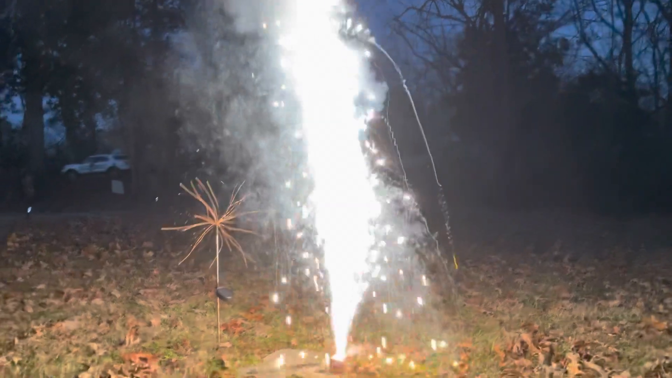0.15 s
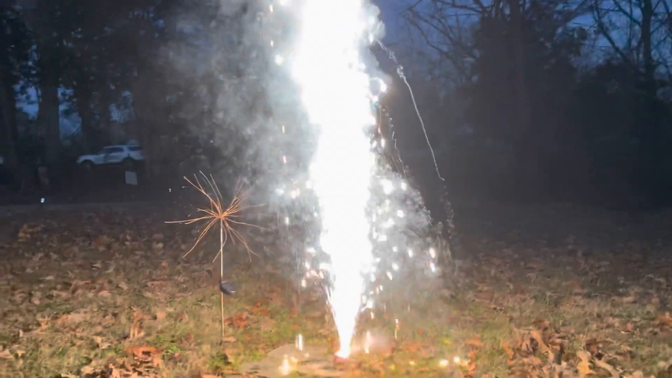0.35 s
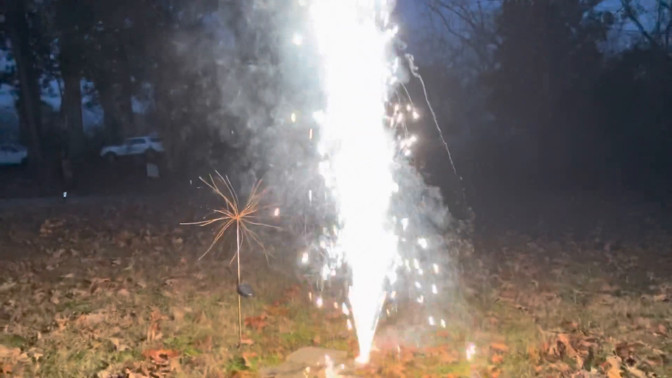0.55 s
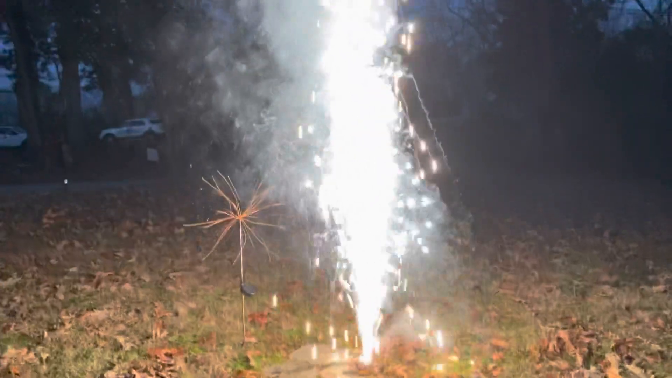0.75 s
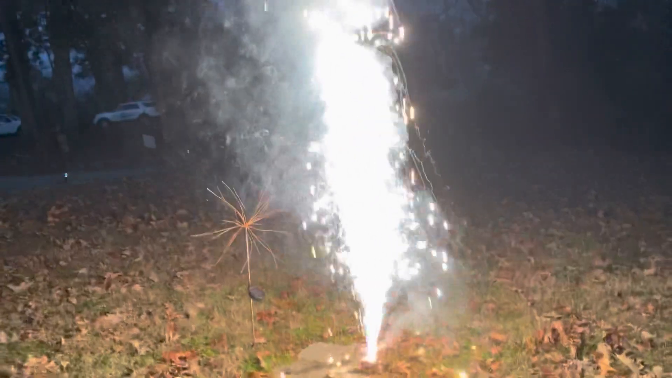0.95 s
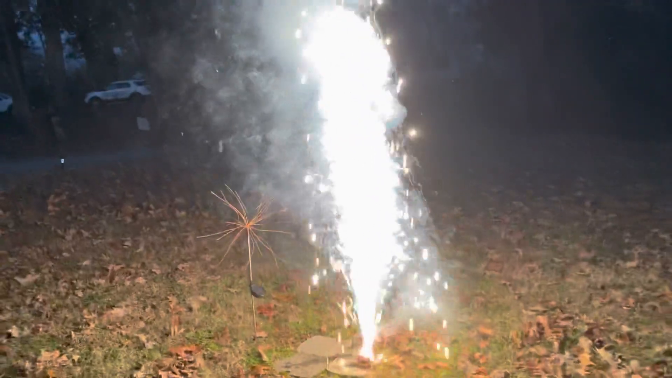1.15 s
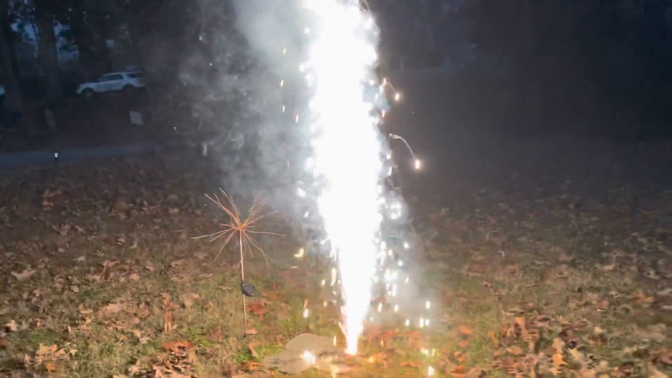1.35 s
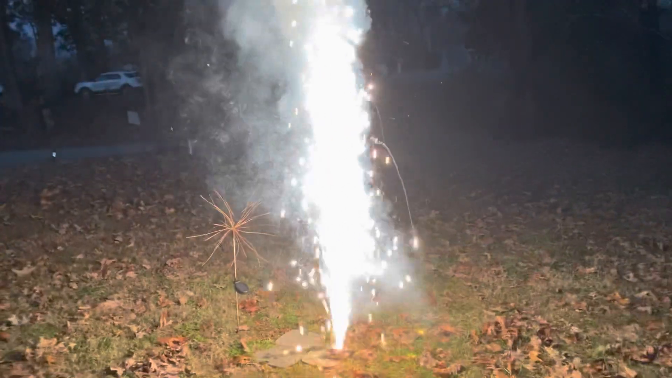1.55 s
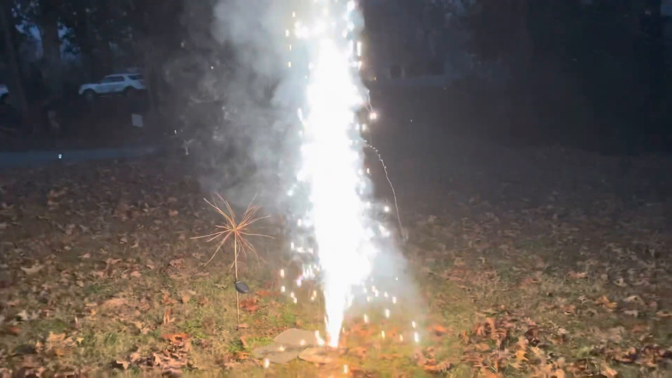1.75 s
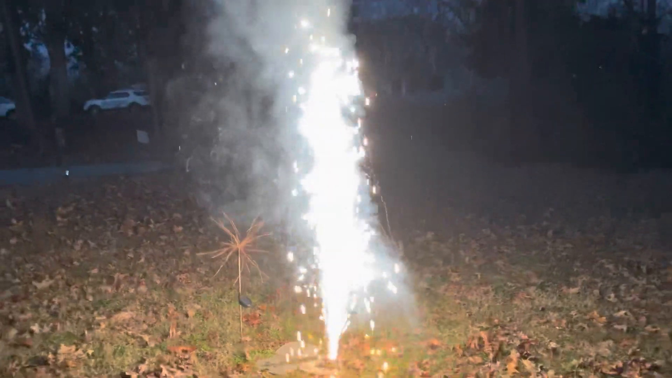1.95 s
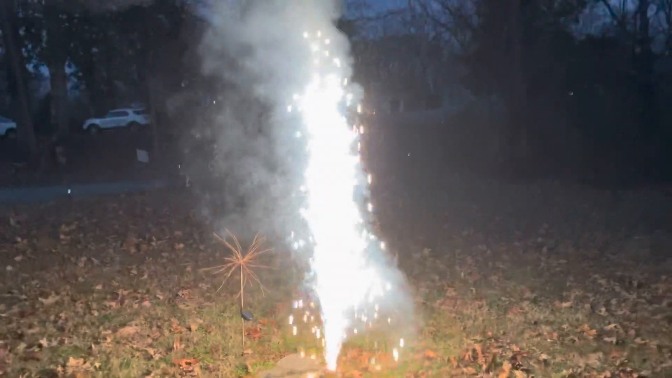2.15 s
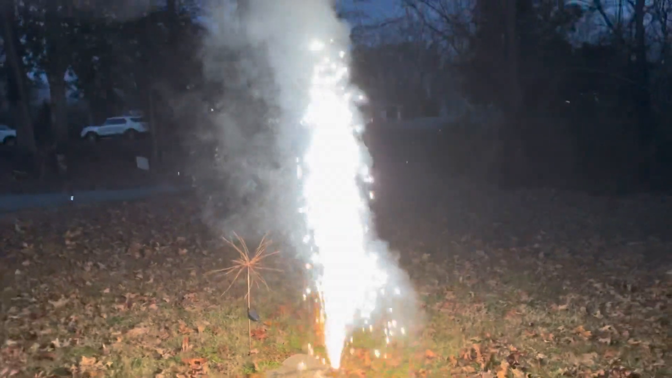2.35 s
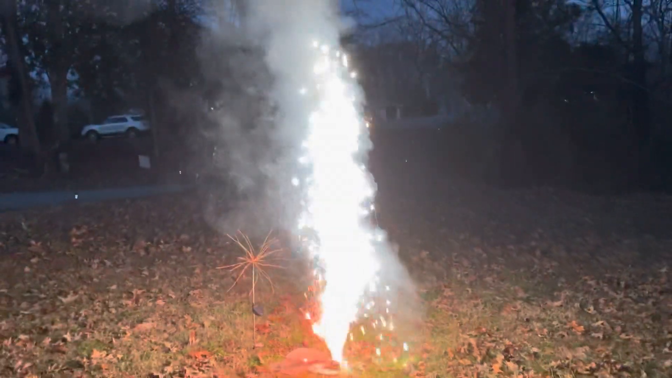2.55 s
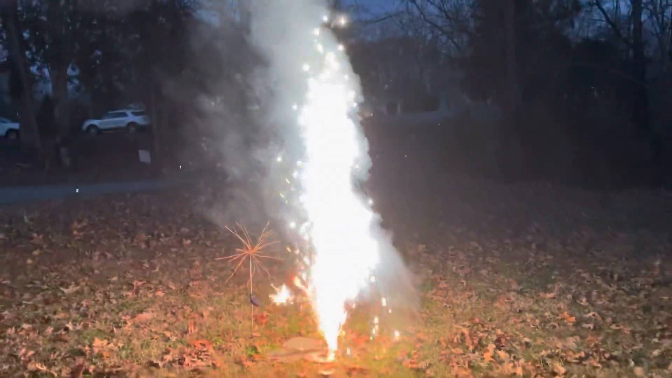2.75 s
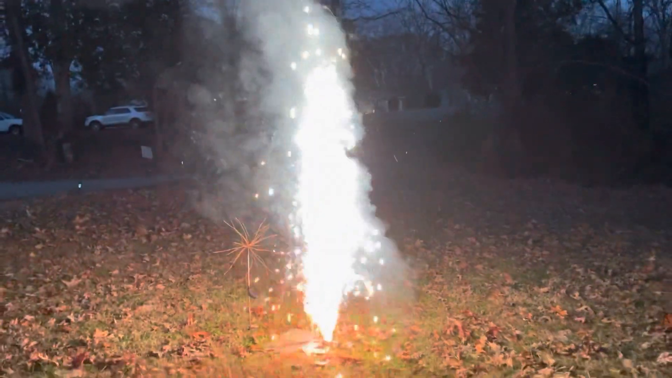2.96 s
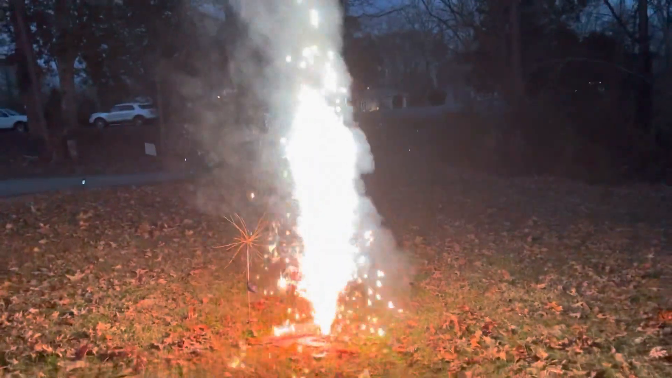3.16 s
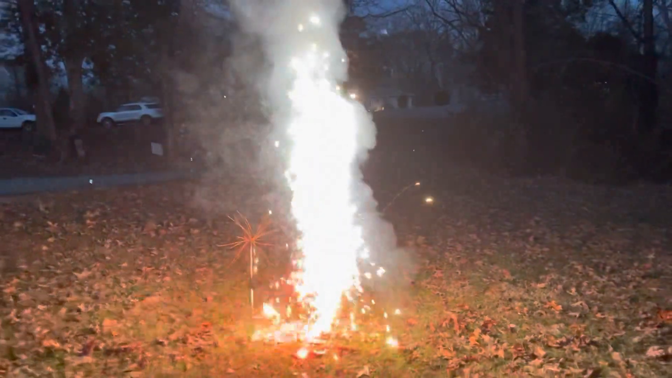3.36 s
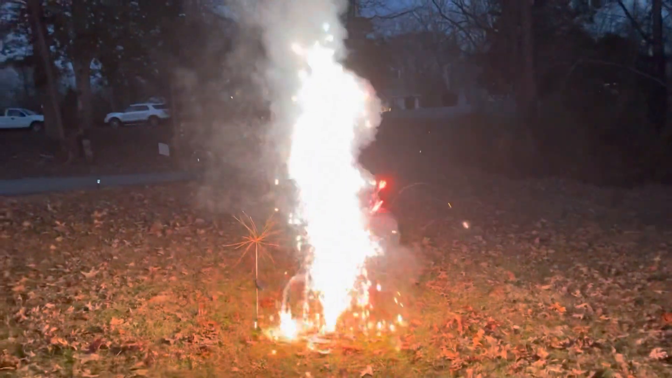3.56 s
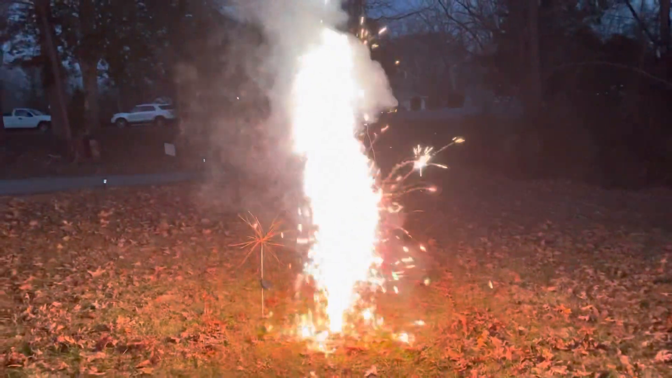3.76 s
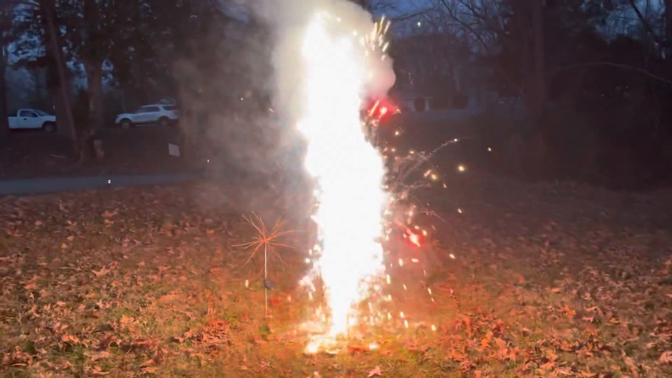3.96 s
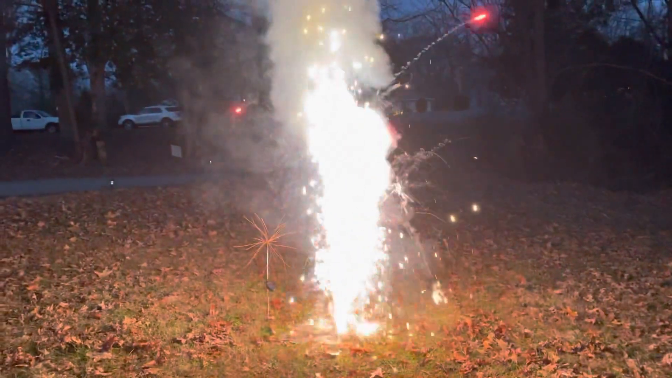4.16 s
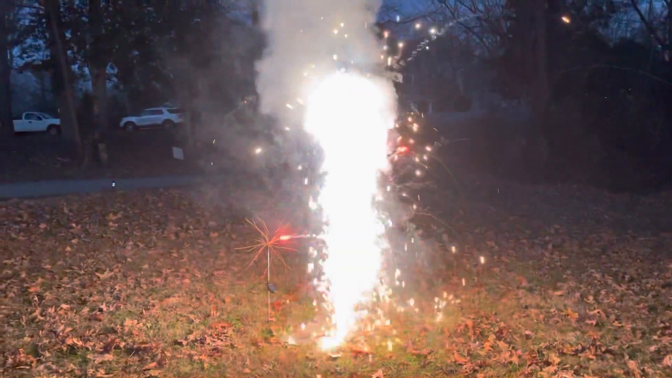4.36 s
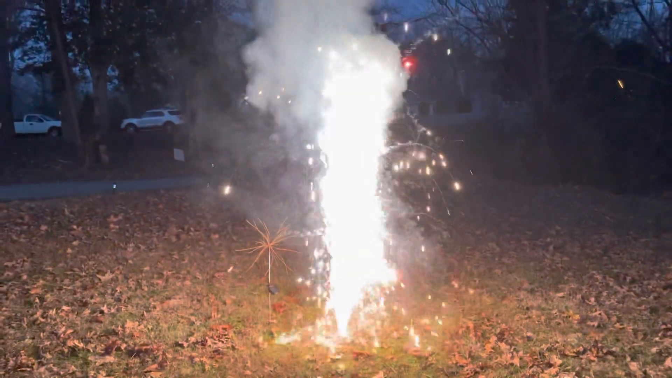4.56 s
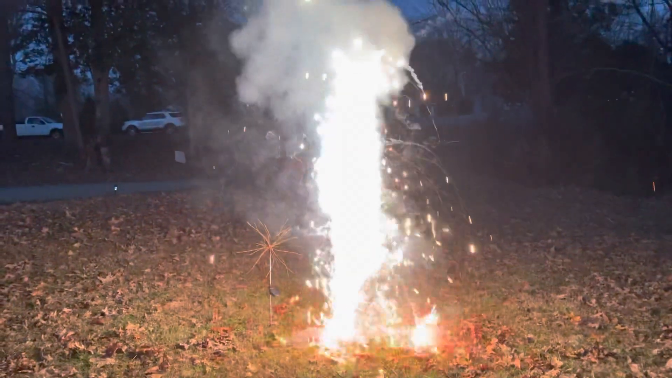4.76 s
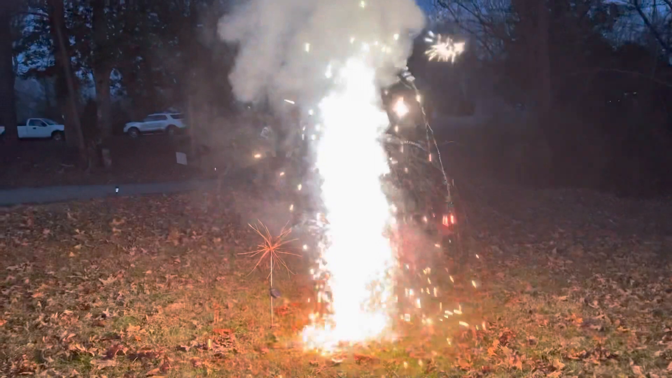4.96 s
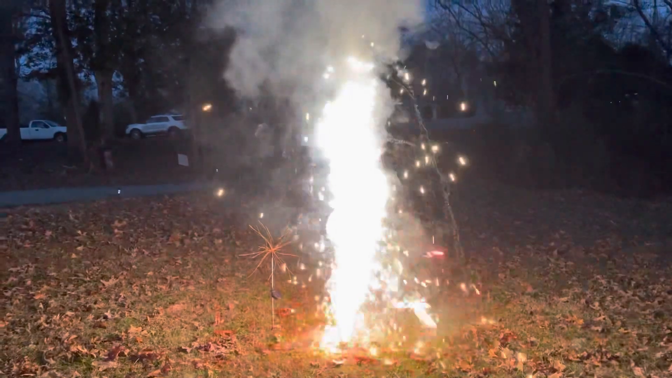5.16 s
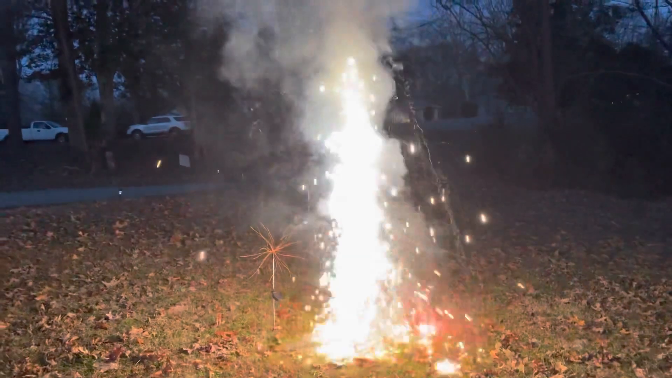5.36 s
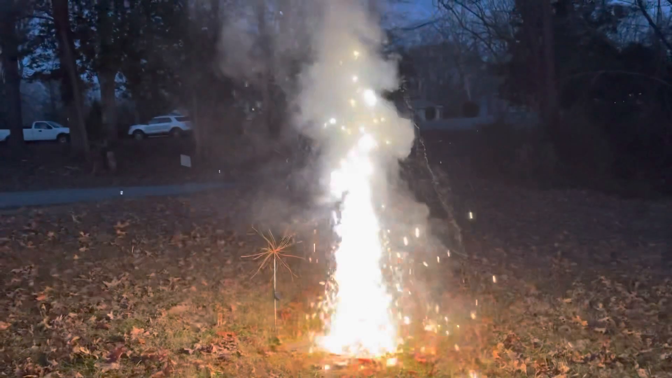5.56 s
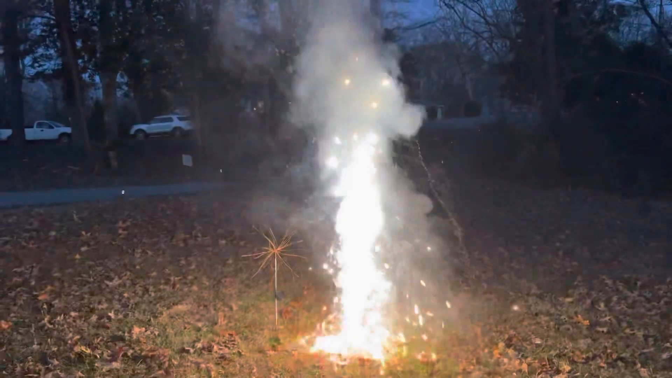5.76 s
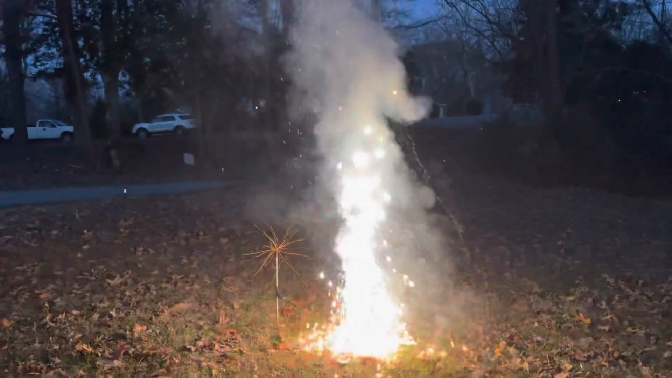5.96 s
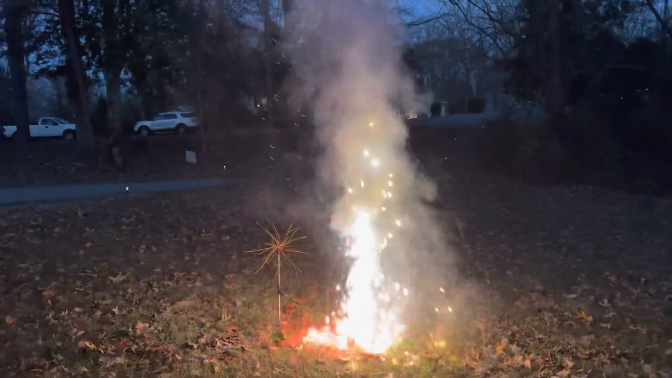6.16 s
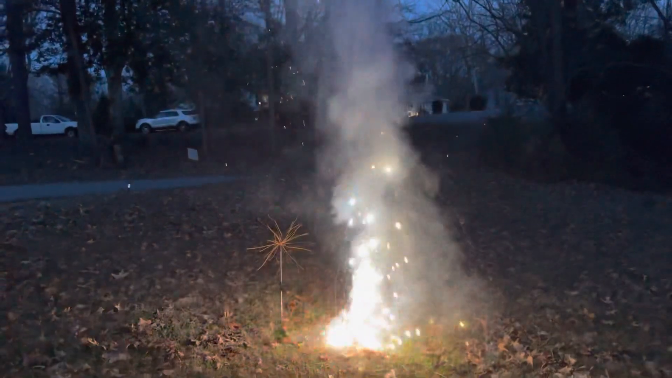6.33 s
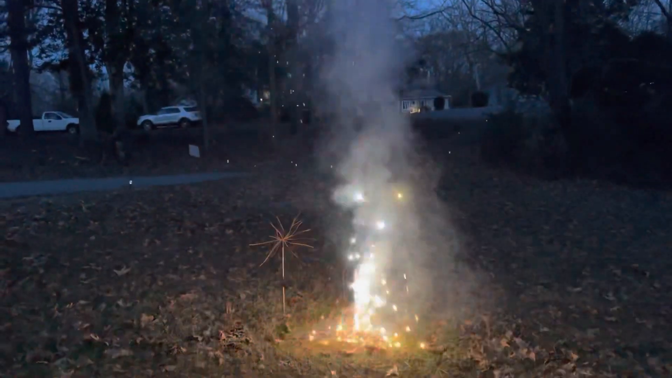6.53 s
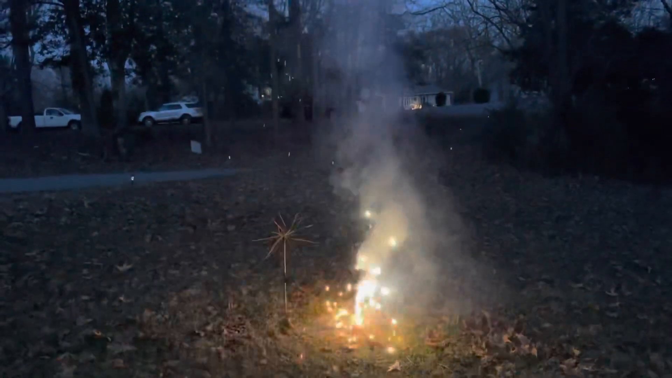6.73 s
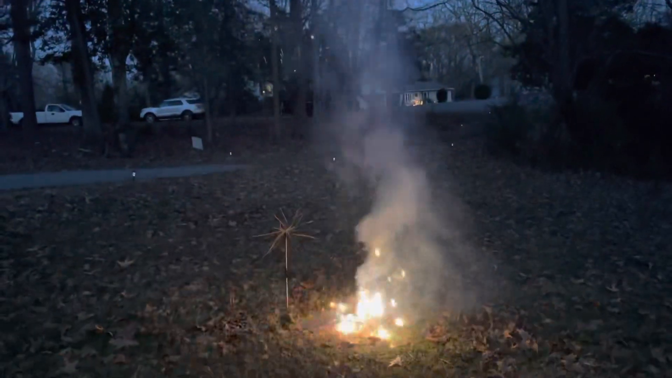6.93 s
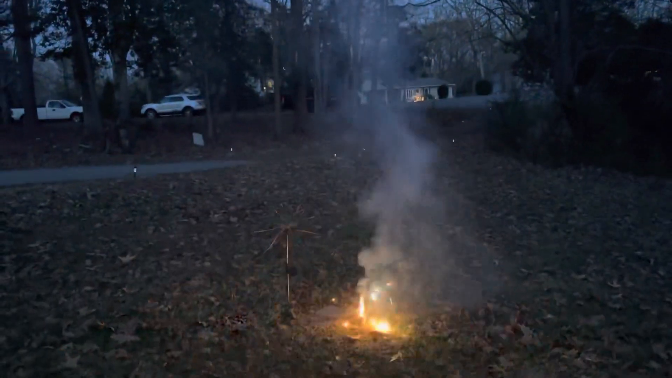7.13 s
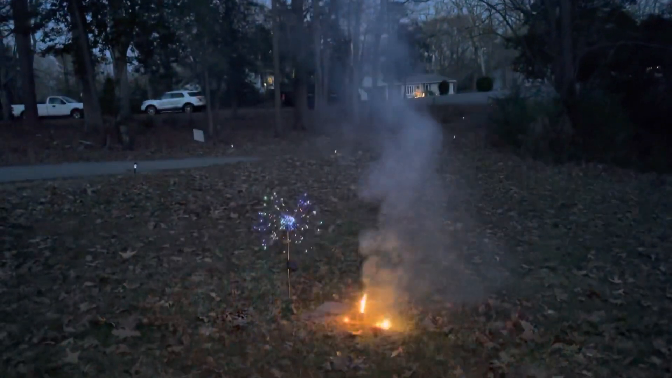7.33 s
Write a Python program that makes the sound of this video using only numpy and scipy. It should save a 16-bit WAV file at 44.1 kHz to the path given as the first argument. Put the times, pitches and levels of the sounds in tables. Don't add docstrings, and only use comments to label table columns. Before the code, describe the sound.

A ground fountain firework is already burning at full force, a few metres from a hand-held phone on a leafy lawn. From 0 to 1.2 s a dense, rough roar and bright hiss dominate, fluttering quickly, with a hollow tone that slides as the phone moves. Sparse dry ticks crack from about 1 s. Around 1.5 to 3 s the jet is somewhat softer but sizzling and brighter, with isolated cracks. From 3.4 s sharper snaps and clustered pops break through, notably near 4, 4.2, 4.6 and 4.9 s. After 5 s the hiss dulls and weakens, falling steeply by 5.8 s. Rapid ragged sputters and small crackles remain over low flame rumble and faint wind, with stronger snaps near 6.3 to 6.7 s. Everything fades, reaching silence about 7.1 s. The picture is essentially mono, close and dry.

```python
import sys
import numpy as np
from scipy import signal
from scipy.fft import rfft, irfft
from scipy.io import wavfile
from scipy.ndimage import uniform_filter1d, map_coordinates

SR = 44100
rng = np.random.default_rng(int(sys.argv[2]) if len(sys.argv) > 2 else 0)


def to_wav(s):
    ch = np.atleast_2d(s).T
    pcm = np.round(np.clip(ch, -1, 1) * 32767)
    wavfile.write(sys.argv[1], SR, pcm.astype(np.int16))


def invert_db(level):
    return 10 ** (np.asarray(level, dtype=float) / 20)


N = 330288

# time in seconds, level in dB, brightness in dB.
BURN = [(0, -29, 2.5), (.28, -29.5, 1.5), (.47, -31, 0), (.62, -28.5, 0.5), (.85, -29, .5),
        (1.17, -31.5, 0.5), (1.5, -35, 1), (2.06, -35, 2), (2.54, -33, 4), (3.1, -35, 3), (3.45, -32.5, 3),
        (4.65, -33, 3.5), (4.98, -34.5, 0), (5.12, -37, -1.5), (5.4, -38, -3), (5.64, -44.5, -5.5),
        (5.81, -54, -2), (7.1, -59.5, -1)]
# centre in seconds, height in dB, length in seconds.
SURGES = [(.03, -4.5, 0.32), (.27, -0.5, 0.027), (.32, -2, .04), (.47, -3, 0.076), (.56, 2, 0.062),
          (.75, -4, 0.063), (1.25, -3.5, 0.083), (1.48, -2, 0.16), (1.62, 3.5, 0.089), (1.7, 0, 0.032),
          (2.24, 1.5, 0.044), (2.45, -2.5, 0.18), (3.06, -1, .06), (3.37, 2, 0.13), (3.48, 2, 0.046),
          (4.15, -2, 0.17), (4.58, 1, 0.18), (5.16, -3, 0.099), (5.24, 5.5, 0.015), (5.845, -0.5, .03),
          (5.893, -5, .03), (5.96, 3.5, .12), (6.46, 3.5, .12), (6.72, 1, 0.074), (6.97, 6, 0.024),
          (1.76, 3, .06), (6.1, 3, 0.11), (6.88, -3.5, .1)]
SURGE_SHARE = (0.29, 0.82, 1.3)
# start in seconds, level in dB, length in ms, bass in dB.
PUFFS = [(3.3794, -12, 7.9, -4), (3.9591, -14.5, 9.0, -10), (4.1856, -17, 8.2, -12),
         (4.6257, -15.5, 12, -1.5), (4.9445, -14.5, 12, -1), (5.236, -23, 9.8, -13), (5.4193, -26, 8.6, 7),
         (5.6354, -22.5, 9.0, 0.5), (5.6538, -26.5, 5.9, 3.5), (5.7, -34.5, 9.0, 2.5),
         (5.7235, -26.5, 15, 5.5), (5.752, -29.5, 15, 3), (5.7824, -29, 7.2, 2), (5.8125, -26.5, 14, 2.5),
         (5.8587, -28, 8.3, 1), (5.9093, -22, 8.4, 0), (5.9591, -24, 6.5, 1), (6.123, -27.5, 4.9, -1.5),
         (6.1594, -30, 9.8, -3), (6.1933, -25, 7, -1.5), (6.231, -32.5, 11, -7.5), (6.2736, -32.5, 9.0, 5),
         (6.325, -21, 9.3, -3), (6.364, -20.5, 12, 0.5), (6.3937, -21, 7.2, 2), (6.4142, -22.5, 9.2, 1.5),
         (6.5914, -25.5, 11, -4.5), (6.637, -20.5, 15, -4), (6.6751, -16, 11.5, -2), (6.7957, -25, 8.4, -2)]
# start in seconds, peak in dB, pressure jump in ms.
STARS = [(1.0112, -15.9, .025), (1.0747, -14.3, .027), (1.2019, -17.2, .025), (1.7721, -17.8, .025),
         (2.2375, -15.6, .096), (2.7016, -16.3, .025), (2.8485, -16.3, .038), (3.516, -13.2, .033),
         (3.5947, -17.8, .025), (3.6321, -12.6, .025), (3.7868, -13.2, .025), (3.8105, -13.3, .066),
         (3.9599, -10.4, .025), (4.1866, -11.8, .025), (4.4111, -13.3, .068), (4.9446, -12, .025),
         (5.1074, -18.1, .035), (5.238, -12.1, .025), (5.3451, -23.6, .077), (5.4199, -18.7, .046),
         (5.5332, -25, .045), (5.7842, -26, .069), (5.9106, -15, .025), (5.9159, -20, .025),
         (6.0805, -31, .025), (6.3262, -16, .025), (6.3992, -19.5, .138), (6.5964, -19.5, .025),
         (6.6806, -18, .061), (6.7978, -17.5, .079)]
# time in seconds, delay in ms, strength from 0 to 1, phase turn in radians.
LAWN = [(0, .42, .36, 1.75), (.3, .435, .5, 1.55), (.5, .385, .62, .95), (.56, .4, .7, .25),
        (.63, .445, .78, -.2), (.72, .515, .82, 0), (.87, .558, .82, 0), (1.0, .528, .8, .1),
        (1.2, .466, .74, -.1), (1.3, .445, .66, .1), (1.4, .425, .62, .65), (1.5, .355, .66, .55),
        (1.68, .36, .64, .65), (1.8, .33, .48, 1.75), (2.3, .325, .55, 1.6), (2.9, .32, .66, 2.05),
        (4.6, .288, .68, 2.0), (6.6, .275, .35, 1.9)]
# time in seconds, delay in ms, strength from 0 to 1, phase turn in radians.
HAND = [(0, 0.16, 0.4, 1.04), (.48, 0.16, 0.78, 1.1), (.57, 0.13, .45, -0.6), (.66, .24, .28, 1.6),
        (.87, .28, .36, 1.6), (1.1, .25, .38, 1.6), (1.3, .222, .4, 1.6), (1.48, .225, .35, .1),
        (1.8, 0.2, 0.26, -0.8), (2.45, 0.16, 0.09, -2.5), (4.3, 0.16, 0.34, -2), (5.6, 0.14, .3, -3),
        (6, 0.062, 0.2, 0.04), (6.5, 0.078, 0.4, 0.3)]
# centre in seconds, height over the calm in dB, length in seconds.
GUSTS = [(.43, 15, .1), (.75, 2, 0.05), (1.42, 11, .06), (1.74, 3, 0.056), (2.32, 1, 0.098), (2.85, 2, .1),
         (2.99, 7, .04), (3.42, 8, .1), (3.71, 3, 0.14), (4.04, 12.5, .08), (4.24, 5, 0.069),
         (4.49, 7, .12), (4.95, 12, 0.35), (5.36, 11.5, 0.086), (5.53, 4, .05), (5.75, 2.5, .06),
         (5.96, 9.5, .08), (6.4, 12.5, 0.13), (6.75, 6, .3), (7.05, 6.5, .15)]
# centre in seconds, low edge in Hz, high edge in Hz, level in dB.
SPREAD = [
    (.085, 4100, 5300, -44),
    (.665, 13700, 15500, -42),
    (2.5, 5700, 6900, -50),
    (2.525, 6900, 8300, -49),
    (2.525, 9600, 11000, -49),
    (2.525, 12300, 13800, -49),
    (2.66, 4100, 5300, -43),
    (2.66, 8200, 9700, -49),
]
# frequency in Hz, gain in dB.
PHONE = [(100, 1.5), (300, 3.5), (650, 2), (1500, 1.5), (2700, -4), (4200, -0.5), (5450, 6), (6400, -3),
         (7500, -2), (8350, -8.5), (9300, -1.5), (11000, -1.5), (13700, 2.5), (15500, 0.5)]

SPENT_FROM_S, SPENT_TO_S, SPENT_RUMBLE_DB, SPENT_SIZZLE_DB = 4.74, 5.93, 14.5, 10
RUMBLE_DB, RUMBLE_GROWTH_DB_PER_S, GUST_TO_RUMBLE, SIZZLE_DB = -24.5, 2.13, 0.21, -6.5
EMBERS_PER_S, EMBER_SHARE = 290, .45
PUFF_ATTACK_S = .0012
STARS_PER_PUFF, STAR_DB, STAR_SCATTER_DB, STAR_JUMP_MS = 3, -4, 4, .045
LAWN_DULL_HZ, TREMBLE_MS = 7200, .007
WIND_DB, WIND_FLICKER_DB = -64.5, -0.5
FADE_FROM_S, FADE_DB_PER_S = 5.955, -25
CLOSE_FROM_S, CLOSE_DB_PER_S = 6.99, -92
TOP_HZ, END_S = 15780, 7.14


def jet():
    level_db, bright_db = curves(BURN)
    t, surge = np.arange(N) / SR, bumps(SURGES)
    spent = np.clip((t - SPENT_FROM_S) / (SPENT_TO_S - SPENT_FROM_S), 0, 1)
    roar_share, hiss_share, sizzle_share = SURGE_SHARE

    roar_db = level_db + roar_share * surge
    hiss_db = level_db + bright_db + hiss_share * surge
    sizzle_db = level_db + SIZZLE_DB + 1.5 * bright_db + sizzle_share * surge + SPENT_SIZZLE_DB * spent
    rumble_db = level_db + RUMBLE_DB + RUMBLE_GROWTH_DB_PER_S * np.minimum(t, SPENT_FROM_S)
    rumble_db = rumble_db + SPENT_RUMBLE_DB * spent ** 2 + GUST_TO_RUMBLE * bumps(GUSTS) + 2.4 * walk(12)
    flutter = .5 * walk(16) + 1.3 * walk(45) + 1.4 * walk(250)

    gas = rng.standard_normal((4, N))
    embers = unit(grains(EMBERS_PER_S, spread_db=2.0))
    sparks = unit(grains(2500, spread_db=5.5)) + EMBER_SHARE / .35 * spent * embers

    rumble_gain = invert_db(rumble_db - 0.5 + .3 * flutter)
    roar_gain = invert_db(roar_db - 3.5 + 0.56 * flutter + 0.45 * walk(25))
    hiss_gain = invert_db(hiss_db - 1.5 + 0.45 * flutter + 0.25 * walk(24.74))
    sizzle_gain = invert_db(sizzle_db + 3.5 + 0.74 * flutter + .8 * walk(25))

    rumble = rumble_gain * unit(band(gas[0], 49, 230))
    roar = roar_gain * unit(band(gas[1] + .35 * sparks, 320, 1970))
    hiss = hiss_gain * unit(band(gas[2] + 0.33 * sparks, 2000, 7180))
    sizzle = sizzle_gain * unit(band(gas[3] + 0.76 * sparks, 7000, 19000))
    return rumble + roar + hiss + sizzle


def snaps():
    size = 8192
    out, t = np.zeros(N + size), np.arange(size) / SR
    chance = rng.standard_normal((len(PUFFS), 3, size))
    for (s, db, ms, bass_db), (air, low, ragged) in zip(PUFFS, chance):
        decay = np.exp(-(t * 1000 / max(ms, .5)) ** 2) + 0.48 * np.exp(-t / 0.04)
        attack = 1 - np.exp(-t / PUFF_ATTACK_S)
        ragged_gain = invert_db(3.8 * unit(uniform_filter1d(ragged, size=40)))
        puff = 0.58 * band(air, 2500, 18000) + invert_db(bass_db) * band(low, 120, 2410)
        i = int(s * SR)
        out[i:i + size] += invert_db(db - 13.5) * decay * attack * ragged_gain * puff
    return out[:N]


def thrown_stars():
    rows = []
    for (s, db, length_ms, _), stars in zip(PUFFS, rng.random((len(PUFFS), STARS_PER_PUFF, 3))):
        for when, size, jump in stars:
            peak_db = db + STAR_DB - 2 * STAR_SCATTER_DB * size
            rows.append((s + when * length_ms / 1000, peak_db, STAR_JUMP_MS * (.5 + jump)))
    return rows


def cracks():
    out, ms = np.zeros(N), np.arange(128) * 1000 / SR
    for s, peak_db, jump_ms in list(STARS) + thrown_stars():
        phase = ms / jump_ms / 1.5
        i = int(s * SR)
        out[i:i + 128] += invert_db(peak_db - .5) * (1 - phase) * np.exp(-phase)
    return out


def late_paths(x):
    delay_ms, strength, turn = curves(LAWN)
    trembling_ms = delay_ms + TREMBLE_MS * walk(30)
    ground = echo(x, trembling_ms, strength, turn, 30, LAWN_DULL_HZ)
    hand = echo(x, *curves(HAND), 2000, 14000)
    return x + 1.15 * ground + hand


def echo(x, ms, strength, turn, lo_hz, dull_hz):
    hz = np.arange(N // 2 + 1) * SR / N + 1
    dull = rfft(x) / (1 + (hz / dull_hz) ** 3) / (1 + (lo_hz / hz) ** 2)
    read = [np.arange(N) - ms * SR / 1000]
    even = map_coordinates(irfft(dull, N), read, order=3)
    odd = map_coordinates(irfft(dull * 1j, N), read, order=3)
    return np.clip(strength, 0, .9) * (np.cos(turn) * even + np.sin(turn) * odd)


def wind():
    gain = invert_db(WIND_DB + bumps(GUSTS) + WIND_FLICKER_DB * walk(8))
    air = rng.standard_normal(N)
    return gain * unit(band(band(air, 36, 110), 30, 98))


def spread():
    size = 2048
    side, window = np.zeros(N), np.hanning(size)
    for (s, lo_hz, hi_hz, db), air in zip(SPREAD, rng.standard_normal((len(SPREAD), size))):
        for _ in range(3):
            air = band(air, lo_hz, hi_hz)
        i = int(s * SR) - size // 2
        side[i:i + size] += invert_db(db + 3) * window * unit(air)
    return side * np.array([[1], [-1]])


def grains(per_s, spread_db):
    when, size, sign = rng.random((3, N))
    loudness = invert_db(-spread_db * np.log(1 - .97 * size))
    return (when < per_s / SR) * loudness * np.sign(sign - .5)


def walk(rate):
    k = int(SR / rate)
    held = np.repeat(rng.standard_normal(N // k + 1), k)
    return 1.28 * uniform_filter1d(uniform_filter1d(held, k), k)[:N]


def bumps(table):
    t = np.arange(N) / SR
    return sum(height * np.exp(-(2 * (t - s) / max(length, .01)) ** 2) for s, height, length in table)


def curves(table):
    s, *columns = np.transpose(table)
    return [np.interp(np.arange(N) / SR, s, c) for c in columns]


def band(x, lo_hz, hi_hz):
    sos = signal.butter(N=2, Wn=[lo_hz, min(hi_hz, 20000)], btype="band", fs=SR, output="sos")
    return signal.sosfilt(sos, x)


def unit(x):
    return x / np.sqrt(np.mean(x ** 2))


def scene():
    t = np.arange(N) / SR
    fire = late_paths(invert_db(-0.5) * (jet() + snaps()) + cracks())
    fade_db = FADE_DB_PER_S * np.maximum(t - FADE_FROM_S, 0) + CLOSE_DB_PER_S * np.maximum(t - CLOSE_FROM_S, 0)
    return np.tile(invert_db(fade_db) * (fire + invert_db(1.5) * wind()), (2, 1))


def top_cut(x):
    return signal.sosfilt(signal.butter(12, 16840, fs=SR, output="sos"), x)


def record(dry):
    hz, db = np.transpose(PHONE)
    log_hz = np.log(np.arange(N // 2 + 1) * SR / N + 1)
    gain = invert_db(np.interp(log_hz, np.log(hz), db))
    coloured = irfft(rfft(dry) * gain, N)
    top = signal.ellip(10, .3, 52, TOP_HZ, fs=SR, output="sos")
    x = signal.sosfilt(top, coloured) * (np.arange(N) < END_S * SR)
    x = np.round((x + spread()) * 2 ** 15) / 2 ** 15
    return top_cut(x)


dry = scene()
out = record(dry)
to_wav(out)
```